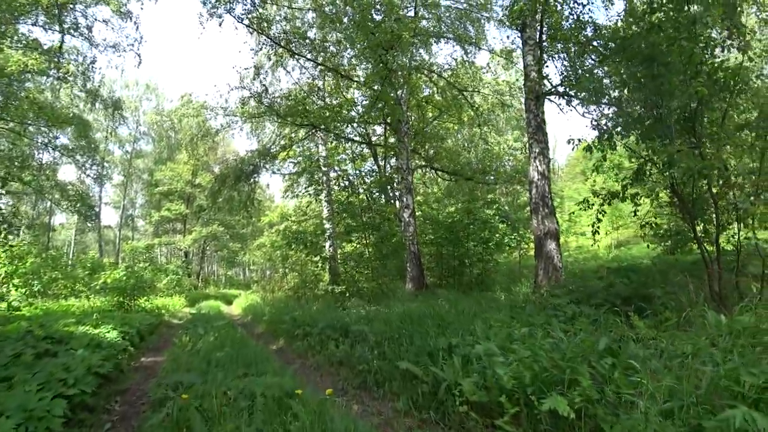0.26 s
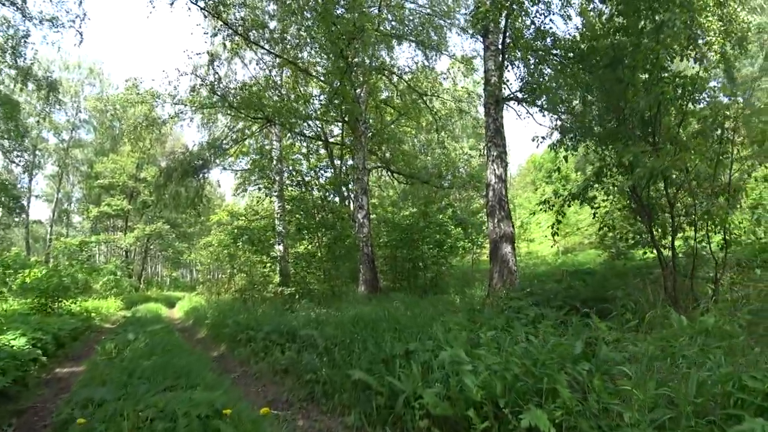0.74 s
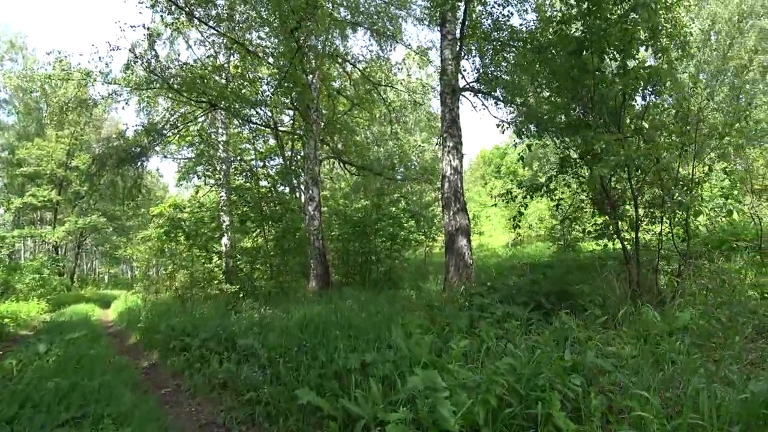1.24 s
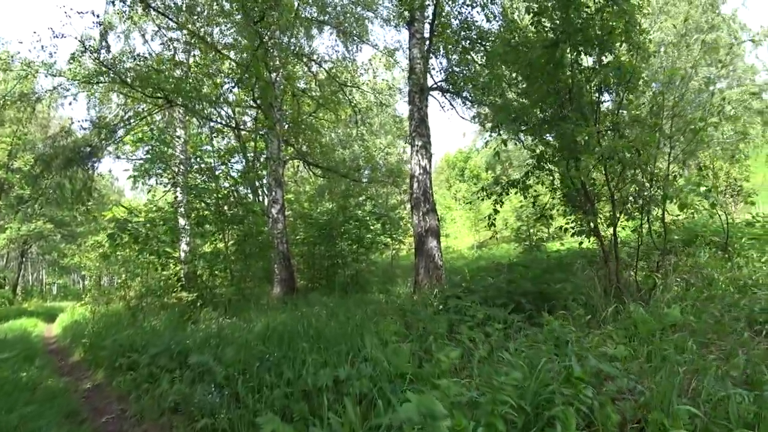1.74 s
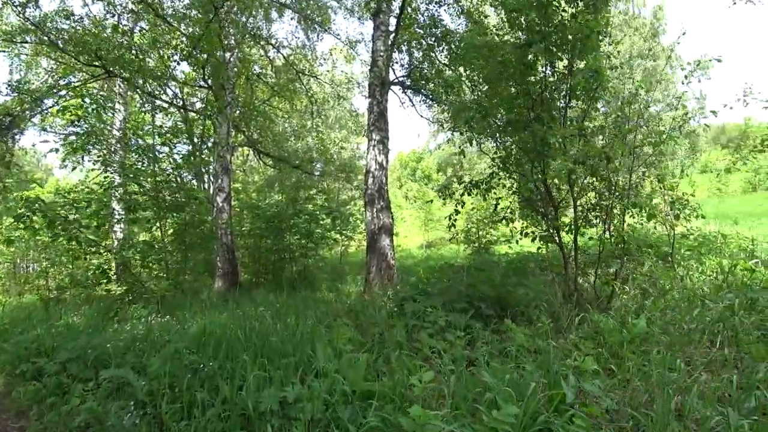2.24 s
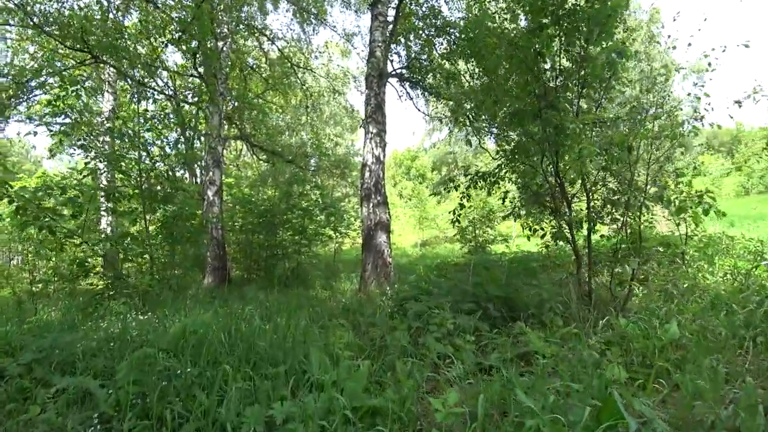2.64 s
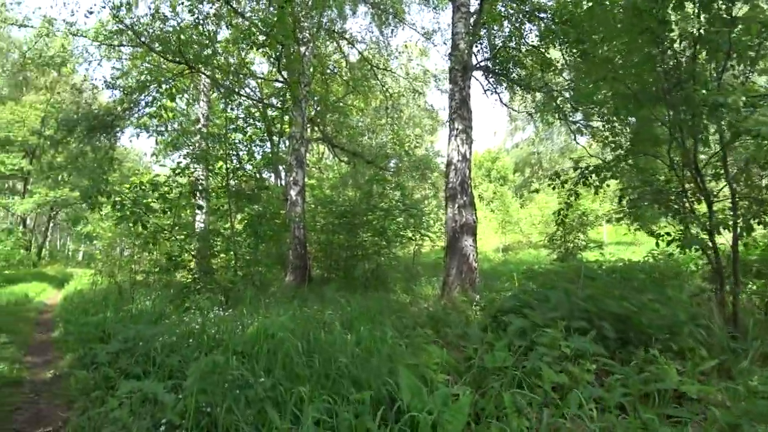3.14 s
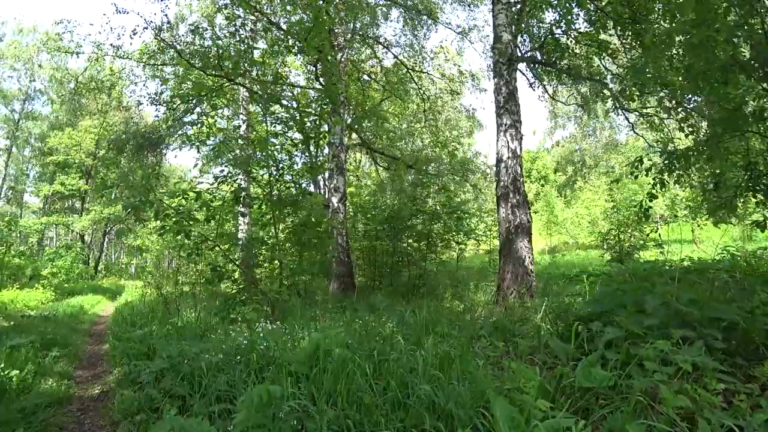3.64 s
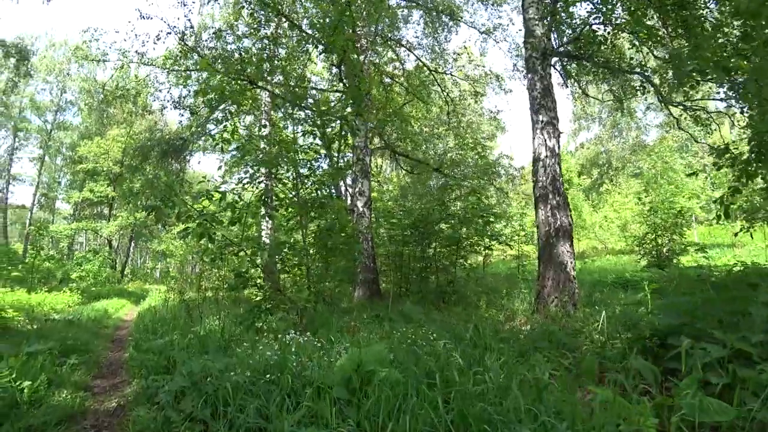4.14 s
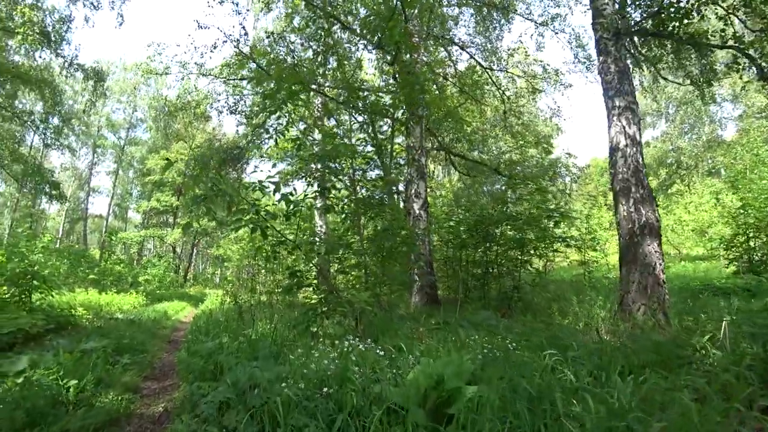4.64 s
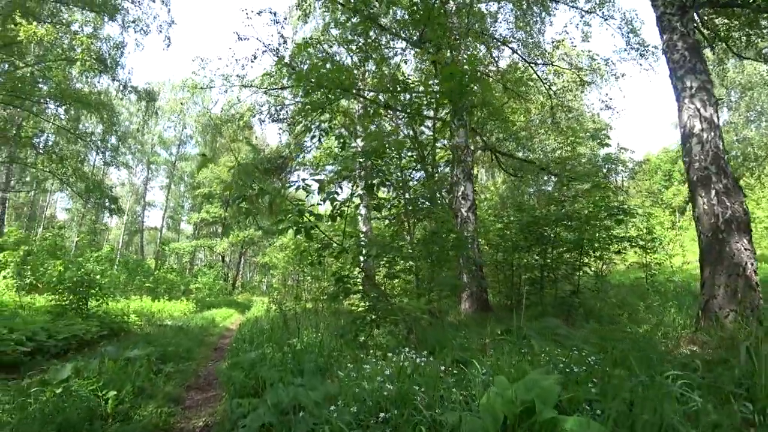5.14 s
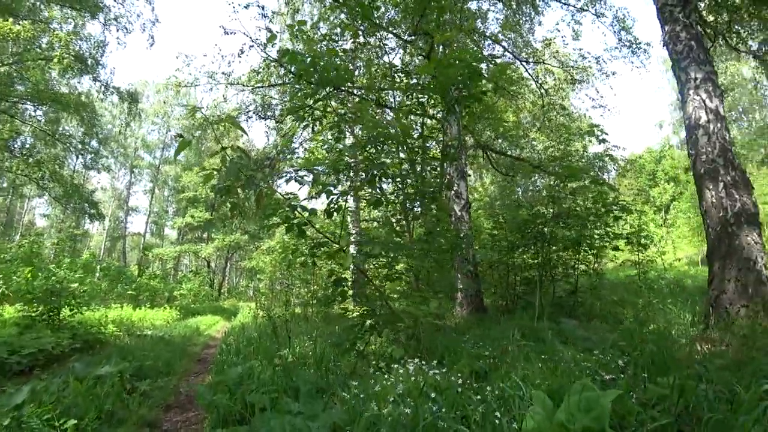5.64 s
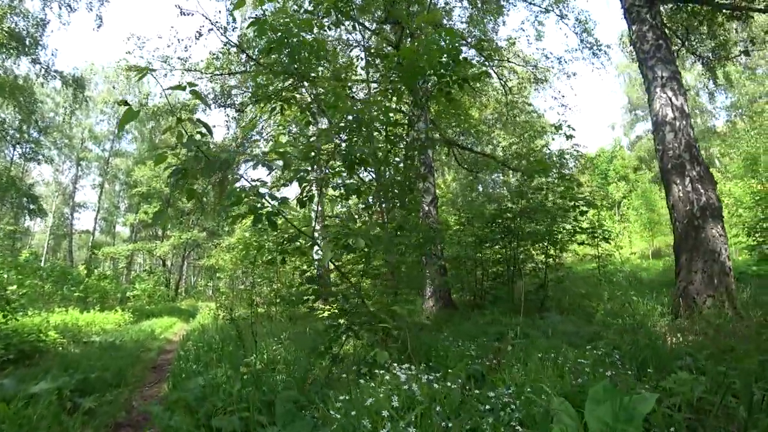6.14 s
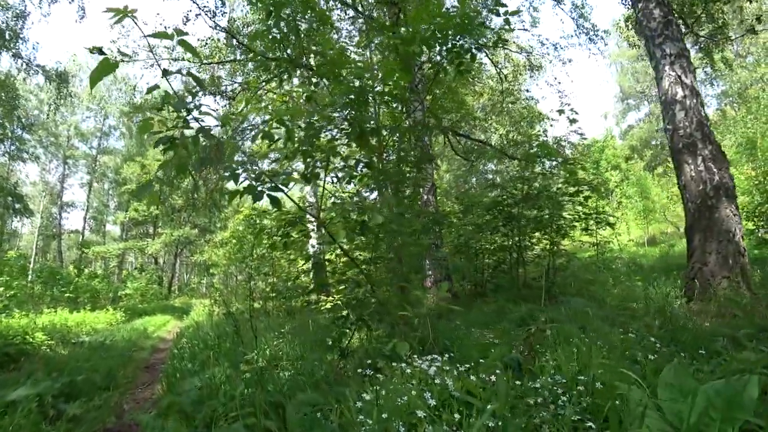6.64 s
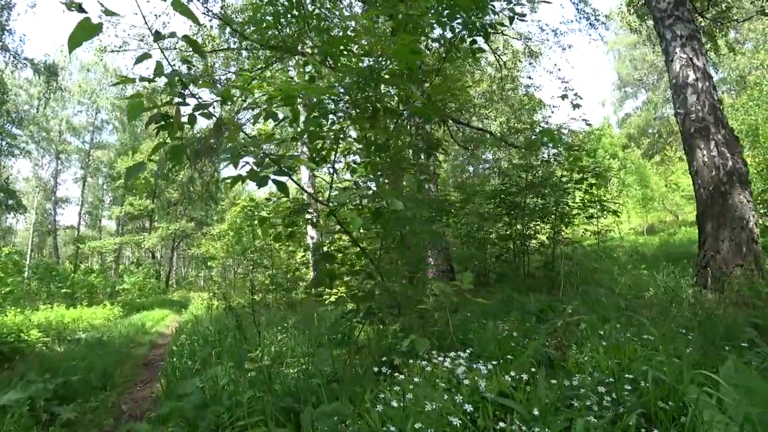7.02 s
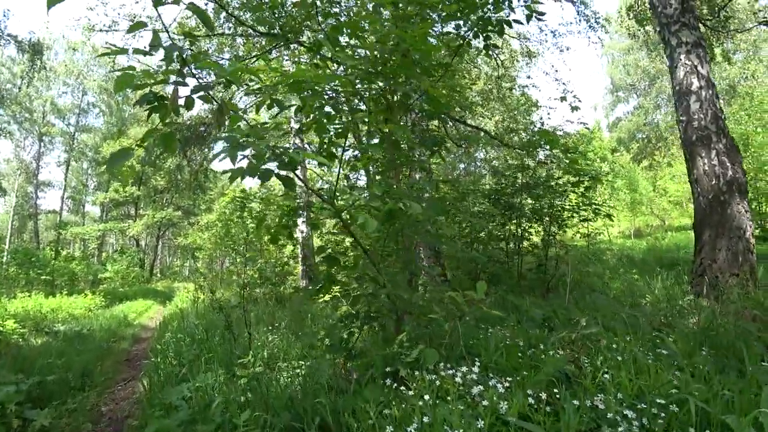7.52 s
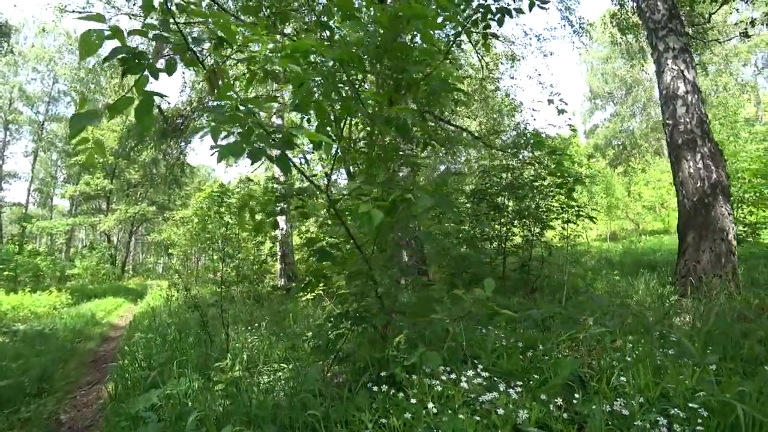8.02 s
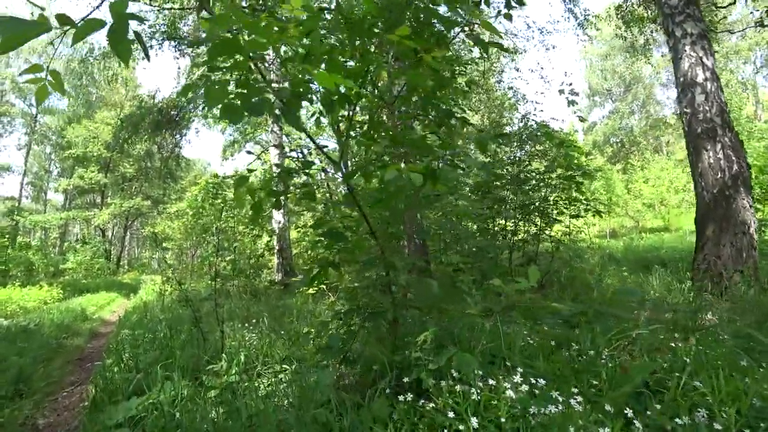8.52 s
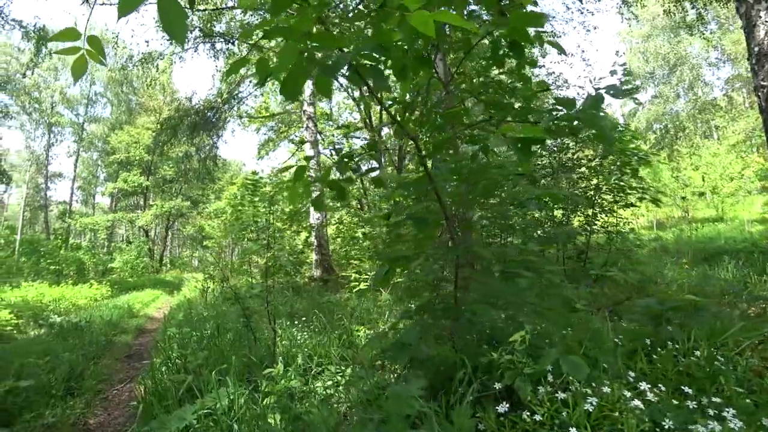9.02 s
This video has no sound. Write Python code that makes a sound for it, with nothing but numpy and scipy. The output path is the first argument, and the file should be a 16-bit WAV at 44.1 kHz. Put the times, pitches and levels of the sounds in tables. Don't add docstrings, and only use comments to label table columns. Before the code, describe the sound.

Open woodland in a light breeze, heard from a stereo microphone at chest height. A soft, wide leaf hiss runs throughout, over a barely audible low drone and a faint high camera whine. From 0 to 3.6 s legs push through tall grass: uneven swishes of a fifth to half a second, stalks whipping back, fine crackle and sharp snaps, densest from 0.4 to 2.6 s. A thin, far bird note falls slightly at 2.95 s. A strong crisp snap comes at 3.4 s. The rustle then fades, leaving sparse ticks and small brushes near 4.5, 5.4 and 5.8 s. Short crunchy brushes with duller stem knocks come at 6.2, 6.45 and 7.05 s. An insect flutters close by in low buzzing bursts from 7.26 to 7.58 s, with faint traces near 7.8 s. Quiet hush follows, then a small rustle at 9.0 s and a weak air puff at the end.

```python
import sys
import numpy as np
from scipy import signal
from scipy.fft import rfft, irfft, next_fast_len
from scipy.io import wavfile
from scipy.ndimage import uniform_filter1d

SR = 44100
rng = np.random.default_rng(int(sys.argv[2]) if len(sys.argv) > 2 else 0)


def magnitude_from_level(level_db):
    exponent = np.asarray(level_db, float) / 20
    return 10 ** exponent


def transcribe(u):
    v = np.clip(np.atleast_2d(u).T, -1, 1)
    q = np.round(v * 32767).astype(np.int16)
    wavfile.write(sys.argv[1], SR, q)


N = 408807


def evened(x):
    return x / np.sqrt(np.mean(x ** 2) + 1e-20)


def read(points, hz):
    f, *columns = np.transpose(points)
    return [np.interp(np.log(hz + 1), np.log(f + 1), column) for column in columns]


def band(x, lo_hz, hi_hz):
    edges = np.clip([lo_hz, hi_hz], 10, SR / 2.1)
    return evened(signal.sosfilt(signal.butter(2, edges, "band", fs=SR, output="sos"), x))


def high_pass(x, hz):
    return signal.sosfilt(signal.butter(2, hz, "high", fs=SR, output="sos"), x)


def drifting_patches(shape, over_time, over_hz):
    noise = rng.standard_normal(shape[::-1]).T
    smooth = uniform_filter1d(noise, size=over_hz, axis=0)
    return evened(uniform_filter1d(smooth, size=over_time, axis=1))


def ports(pair, table):
    size = next_fast_len(N)
    a, b = rfft(pair, size)
    same, lead, lean_db = read(table, np.fft.rfftfreq(size, 1 / SR))
    same = np.clip(same, 0, 1)
    half = np.exp(.5j * lead) * magnitude_from_level(lean_db / 2)
    left = a * half
    right = (same * a + np.sqrt(1 - same ** 2) * b) / half
    return irfft(np.array([left, right]), size)[:, :N]


# (frequency [Hz], likeness [0-1], left leads [rad], left over right [dB])
NEAR = [(200, 0.84, 0.23, 0.3), (700, 0.75, 0.19, 1), (2700, 0.9, 0.44, 3.7), (5400, 0.84, 0.12, 1.1),
        (7760, 0.95, 0.18, 2.2), (8500, 0.81, 1.44, 0.99), (10900, 0.6, 0.71, 3.2)]
# (centre [Hz], width [Hz])
PARTS = [
    (5550, 7700),
    (2180, 4230),
    (9300, 1880),
    (756, 1280),
]


def grass(smooth=1.3, clump_db=1.0, patchy_db=1.2):
    clumps = magnitude_from_level(clump_db * evened(uniform_filter1d(rng.standard_normal(N), size=500)))
    rub = crackle(ticks_per_s=2200, spread_db=2.8) + smooth * rng.standard_normal((2, N))
    hz, t, z = signal.stft(evened(clumps * rub), SR, nperseg=256, noverlap=192)
    centre_hz, width_hz = np.transpose(PARTS)
    per_hz_db = np.array(strokes(t)) - 10 * np.log10(2 * width_hz / SR)[:, None]
    order = np.argsort(centre_hz)
    log_centre = np.log(centre_hz[order])
    blend = np.transpose([np.interp(np.log(hz + 1), log_centre, row[order]) for row in np.eye(len(PARTS))])
    colour_db = blend @ per_hz_db - 19.7 * np.log2(np.maximum(hz / 8500, 1))[:, None]
    patches = drifting_patches(colour_db.shape, over_time=20, over_hz=6)
    shaped = signal.istft(z * magnitude_from_level(colour_db + patchy_db * patches), SR, nperseg=256, noverlap=192)[1]
    return ports(high_pass(shaped, 400)[:, :N], NEAR)


# (start [s], length [s], blades [dB], weight toward thick stems [dB], change by the end [dB])
SWEEPS = [(.05, 0.28, -61.5, 2, 0), (.43, .22, -49.5, -4, -2), (0.654, 0.27, -45, -3.5, -5),
          (0.88, 0.33, -50.5, -6, -13), (1.299, .52, -44.5, -2, -1), (1.81, .17, -47, -2, -8),
          (2.022, 0.22, -50, -2, 1), (2.192, .3, -42, -2, -6.5), (2.49, 0.14, -46, -0.5, -7.5),
          (2.62, 0.45, -59.5, 1.5, 2.5), (3.03, 0.39, -48.5, -6, 1), (3.42, 0.46, -54.5, -2, -7.5),
          (3.85, 0.87, -59.5, 3, -15), (4.688, 0.11, -59, -13, -4), (5.354, 0.3, -54, 2.5, -19),
          (6.074, 0.11, -67, 6, 9), (6.242, 0.11, -54, 3, -8), (6.44, 0.16, -46.5, 0, -19),
          (6.96, 0.079, -61, -1, 11), (7.045, 0.18, -47.5, 0.5, -7), (9.02, 0.19, -58, 4.5, -7)]
# (time [s], half width [s], blades [dB], weight toward thick stems [dB])
FLICKS = [(.13, .02, -48.5, -1), (.23, 0.037, -55.5, 0), (0.359, 0.024, -46.5, -4), (.44, 0.028, -50.5, -1),
          (1.08, .04, -59, -4), (1.25, .03, -54, -4), (1.32, 0.068, -51, -11), (1.38, 0.037, -42, -8),
          (1.74, .05, -51.5, 7), (1.49, 0.052, -43.5, -21), (1.6, 0.026, -52, -5),
          (1.66, 0.038, -47.5, 7.5), (1.96, 0.027, -46.5, -9), (2.01, 0.024, -41, -8.5),
          (2.17, .02, -46, -4), (2.24, 0.057, -43.5, 1), (2.35, 0.057, -47.5, 0), (2.53, 0.027, -48.5, 1),
          (3.08, .03, -50, -14), (3.17, .04, -47.5, -3), (3.3, 0.071, -44, -2), (3.41, 0.013, -52.5, 5),
          (3.59, .02, -60, -8), (4.49, 0.036, -53.5, 3), (5.37, .02, -54, 1), (5.5, .03, -55, 2),
          (5.8, 0.028, -53, -5), (6.22, 0.034, -45.5, 3.5), (9.01, 0.027, -52, 0)]
# (over the stroke [dB], gain per weight [dB/dB], loss per force [dB/dB], at rest [dB])
SHARES = [
    (-0.5, 0, 0, -67),
    (-0.5, 1, 0, -60.5),
    (-8.5, -0.23, 0.2, -69.5),
    (-12, 0.96, 0.14, -56),
]


def strokes(t):
    rise_s, fall_s = 0.034, 0.026
    skirt_db = -10
    usual_db = -50
    start, length, sweep_db, sweep_weight, change_db = np.transpose(SWEEPS)[:, :, None]
    opening = (t - start) / rise_s + .5
    closing = (start + length - t) / fall_s + .5
    gate = np.clip(np.minimum(opening, closing), 0, 1)
    sweeps = gate * magnitude_from_level(sweep_db + change_db * np.clip((t - start) / length, 0, 1))
    at, half, flick_db, flick_weight = np.transpose(FLICKS)[:, :, None]
    flicks = magnitude_from_level(flick_db + skirt_db * abs(t - at) / half)
    stroke = np.vstack([sweeps, flicks])
    weight = np.vstack([sweep_weight, flick_weight])
    force_db = np.vstack([sweep_db, flick_db]) - usual_db
    levels_db = []
    for over_db, follow, lose, rest_db in SHARES:
        part = stroke * magnitude_from_level(over_db + follow * weight - lose * force_db)
        levels_db.append(10 * np.log10((part ** 2).sum(0) + magnitude_from_level(rest_db) ** 2))
    return levels_db


def crackle(ticks_per_s, spread_db):
    kinds = rng.standard_normal((12, 40)) * np.exp(-np.arange(40) / 7.)
    size = magnitude_from_level(spread_db * np.minimum(rng.exponential(1, (2, N)), 3.5))
    size = size * rng.choice([-1., 1.], (2, N))
    struck = rng.random((2, N)) < ticks_per_s / SR
    kind = np.where(struck, rng.integers(0, len(kinds), (2, N)), -1)
    return evened(sum(signal.oaconvolve(size * (kind == k), burst[None])[:, :N]
                      for k, burst in enumerate(kinds)))


# (time [s], peak [dB], low [Hz], high [Hz])
SNAPS = [(.2243, -35, 1160, 5210), (.2326, -35, 3230, 6800), (.5025, -33, 1210, 6850),
         (.6715, -32, 3400, 7020), (.76, -28, 2890, 6500), (.7794, -31, 2670, 7800),
         (.7869, -29, 2760, 5000), (.7981, -33, 1980, 4910), (.9001, -33, 2970, 8790),
         (.9422, -33, 2200, 4180), (1.0909, -27, 2900, 5600), (1.1564, -34, 3400, 8740),
         (1.2042, -35, 1640, 5470), (1.6463, -29, 1550, 3270), (1.7984, -30, 1720, 3880),
         (1.809, -30, 1590, 5340), (1.8465, -27, 2410, 5040), (1.8499, -31, 3270, 7240),
         (1.9472, -32, 2410, 7800), (2.0095, -33, 3960, 7840), (3.4074, -24, 1500, 5940),
         (3.412, -30, 3750, 7490), (3.4175, -27, 1600, 6590), (3.5581, -35, 3140, 7240),
         (4.4909, -31, 1500, 7500), (6.2127, -30, 1890, 4350), (6.4551, -33, 3190, 6630),
         (6.4906, -34, 2200, 8570), (7.0543, -30, 4180, 7280), (7.0962, -29, 1380, 3570)]
# (time [s], peak [dB], middle [Hz])
KNOCKS = [(1.5462, -33, 1580), (2.2431, -31, 2080), (4.0175, -42, 2040), (4.0624, -40, 2220),
          (5.1732, -43, 2640), (5.726, -41, 2340), (6.2051, -35, 1550), (6.2294, -36, 1230),
          (6.2344, -32, 1200), (6.2387, -33, 1200), (6.2457, -34, 990), (6.4321, -39, 2750),
          (6.5551, -41, 1150), (7.0682, -37, 1140), (7.073, -37, 1620), (7.0858, -36, 1650),
          (7.0894, -34, 1340), (7.1039, -35, 1210), (7.1072, -35, 1400), (7.1274, -38, 1410),
          (7.1354, -36, 1620), (7.1457, -34, 1560), (7.598, -43, 1660), (8.4795, -41, 790),
          (9.1105, -39, 2530)]
# (time [s], peak [dB], middle [Hz])
TICKS = [(.125, -39, 7400), (.3514, -39, 6900), (.4089, -40, 2800), (.9977, -38, 3100), (1.074, -36, 3500),
         (1.1149, -36, 3700), (1.3055, -32, 2800), (1.8581, -37, 6700), (2.0139, -33, 5700),
         (2.1156, -36, 2900), (2.6679, -37, 3000), (2.7266, -39, 2600), (2.8425, -37, 3600),
         (2.8958, -38, 4000), (3.1671, -34, 6000), (3.426, -37, 6700), (3.4883, -37, 6000),
         (3.5788, -38, 4100), (3.5833, -38, 4700), (3.5892, -37, 3200), (3.6579, -43, 6800),
         (4.1704, -43, 7400), (4.4494, -44, 6800), (4.6931, -43, 8200), (4.7212, -44, 7600),
         (5.8124, -46, 6300), (6.5331, -40, 4500), (7.0046, -42, 7000), (7.1422, -39, 6500)]


def snaps(tear=.45, scatter_db=-18):
    knock_span, tick_span_hz = 1.36, 1490
    lean_db, lean_db_per_octave = 2, 0.2
    out, t = np.zeros((2, N + 600)), np.arange(600) / SR
    breaks = [*SNAPS]
    breaks += [(s, db, hz / knock_span, hz * knock_span) for s, db, hz in KNOCKS]
    breaks += [(s, db, hz - tick_span_hz, hz + tick_span_hz) for s, db, hz in TICKS]
    for s, peak_db, lo_hz, hi_hz in breaks:
        noise = rng.standard_normal((3, 600))
        blow = signal.unit_impulse(600) + tear * noise[0] * np.exp(-t * hi_hz / 2.5)
        scatter = magnitude_from_level(scatter_db) * noise[1:] * np.exp(-t / .002) * (1 - np.exp(-t / .0004))
        ring = band(blow + scatter, .8 * lo_hz, 1.15 * hi_hz)
        ring = band(ring, .6 * lo_hz, 1.4 * hi_hz)
        pan_db = lean_db + lean_db_per_octave * np.log2(np.sqrt(lo_hz * hi_hz) / 1000)
        sides = magnitude_from_level([[pan_db / 2], [-pan_db / 2]])
        at = round(s * SR) - abs(ring[0]).argmax()
        out[:, at:at + 600] += magnitude_from_level(peak_db) * ring / abs(ring).max() * sides
    return out[:, :N]


# (time [s], length [s], low [Hz], high [Hz], level [dB])
TOUCHES = [
    (7.73, .12, 7200, 10800, -72),
    (8.48, .045, 350, 1100, -59),
    (2.2, .07, 200, 500, -62),
    (7.065, .05, 750, 2100, -49),
    (7.12, .035, 1000, 1900, -53),
    (2.01, .1, 550, 1100, -56),
    (6.44, .07, 8500, 10900, -62),
    (6.985, .035, 7000, 10800, -64),
]


def touches():
    out = np.zeros(N)
    for s, length, lo_hz, hi_hz, db in TOUCHES:
        count = round(length * SR)
        puff = band(rng.standard_normal(count), lo_hz, hi_hz) * signal.windows.tukey(count, .5)
        out[round(s * SR):][:count] = magnitude_from_level(db) * puff
    return out


# (time [s], length [s], peak [dB], first [Hz], last [Hz])
BUZZES = [
    (7.261, 0.032, -45, 125, 98),
    (7.352, 0.058, -50, 133, 96),
    (7.42, .02, -54, 100, 100),
    (7.45, .06, -51, 88, 104),
    (7.517, 0.06, -65, 99, 95),
    (7.777, .042, -67, 100, 95),
    (7.82, .035, -71, 115, 110),
]
# (multiple, level [dB])
WINGS = [(1, 6), (2, 0), (3, -18), (4, -9)]


def insect():
    lead = np.array([[1.54], [0]])
    out = np.zeros((2, N))
    for s, length, peak_db, first_hz, last_hz in BUZZES:
        u = np.arange(round(length * SR)) / (length * SR)
        turn = 2 * np.pi * np.cumsum(first_hz + (last_hz - first_hz) * u) / SR
        beats = sum(magnitude_from_level(db) * np.sin(k * turn + lead) for k, db in WINGS)
        at = round(s * SR)
        out[:, at:at + len(u)] += magnitude_from_level(peak_db - 8.5) * beats * np.sin(np.pi * u ** .45)
    return high_pass(out, 60)


# (time [s], level [dB])
GUSTS = [
    [(6.8, -117), (6.904, -91), (6.958, -88), (7.11, -84), (7.158, -98), (7.25, -76)],
    [(8.6, -82), (8.678, -98), (8.882, -77), (8.912, -83), (9.05, -79), (9.152, -82), (9.216, -74),
     (9.27, -64.5)],
]


def gusts():
    t, air = np.arange(N) / SR, rng.standard_normal((3, N))
    level = sum(magnitude_from_level(np.interp(t, *np.transpose(rows), left=-150, right=-150)) for rows in GUSTS)
    return level * band(air[0] + .3 * air[1:], 40, 110)


# (time [s], length [s], first [Hz], last [Hz], peak [dB])
BIRD = (2.95, .2, 3430, 3330, -58)


def bird():
    s, length, first_hz, last_hz, db = BIRD
    out, count = np.zeros(N), round(length * SR)
    tone = np.sin(2 * np.pi * np.cumsum(np.linspace(first_hz, last_hz, count)) / SR)
    out[round(s * SR):][:count] = magnitude_from_level(db) * tone * signal.windows.tukey(count, .5)
    return out


# (frequency [Hz], level [dB per Hz])
CANOPY = [(12, -65), (20, -43), (81, -20), (134, -15), (346, -10.5), (542, 1), (745, 3.5), (1230, 3),
          (1440, 1.5), (1830, -0.5), (2790, -2), (3270, -2), (4250, -5), (8010, -15), (11000, -62),
          (14300, -55), (22000, -120)]
# (time [s], level [dB])
BREEZE = [(0.0, -56.5), (2.07, -58), (2.24, -53), (2.74, -59.5), (3.25, -57), (3.51, -58), (6.45, -57.5),
          (6.89, -57.5), (7.23, -56), (7.62, -57.5), (8.0, -57), (8.31, -57), (9.27, -56.5)]
# (frequency [Hz], likeness [0-1], left leads [rad], left over right [dB])
FAR = [(60, 0.96, 0.05, 8), (130, 0.93, 0.11, -2.5), (300, 0.71, 0.28, -1), (696, 0.71, 0.7, 0.8),
       (2660, 0.55, 1, 0.3), (5000, 0.53, .2, 1.2), (7150, 0.42, 0.22, -4), (9000, 0.43, .55, 6),
       (10600, .45, .1, 5)]


def canopy():
    frames, hz = N // 256 + 5, np.fft.rfftfreq(1024, 1 / SR)
    a, b, c, d = rng.standard_normal((frames, 513, 4)).T
    patches = drifting_patches((513, frames), over_time=16, over_hz=14)
    z = np.array([a + 1j * b, c + 1j * d]) * magnitude_from_level(read(CANOPY, hz)[0][:, None] + 1.18 * patches)
    hush = evened(signal.istft(z, nperseg=1024, noverlap=768)[1][:, :N])
    s, level_db = np.transpose(BREEZE)
    return magnitude_from_level(np.interp(np.arange(N) / SR, s, level_db) + 4.5) * ports(hush, FAR)


# (frequency [Hz], level [dB])
WHINE = [(8952, -84), (9001, -83)]


def tones():
    drone_hz, drone_width_hz, drone_db = 126.6, 74, -86
    t, drift = np.arange(N) / SR, rng.standard_normal((3, N))
    waver = magnitude_from_level(1.6 * evened(uniform_filter1d(drift[0], size=4000)))
    whine = sum(magnitude_from_level(db + 3) * np.sin(2 * np.pi * hz * t) for hz, db in WHINE) * waver
    drone = band(drift[1:], drone_hz - drone_width_hz / 2, drone_hz + drone_width_hz / 2)
    return whine + magnitude_from_level(drone_db) * ports(drone, FAR)


def scene():
    return grass() + snaps() + touches() + insect() + gusts() + bird() + canopy() + tones()


def low_pass(x):
    return signal.sosfilt(signal.butter(12, 12310, fs=SR, output="sos"), x)


def record(dry):
    edge_hz = 11045
    limit = signal.firwin(2047, edge_hz, window=("kaiser", 9), fs=SR)
    limited = signal.oaconvolve(dry, limit[None], "same")
    return low_pass(limited)


dry = scene()
out = record(dry)
transcribe(out)
```